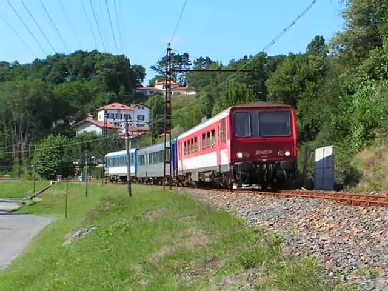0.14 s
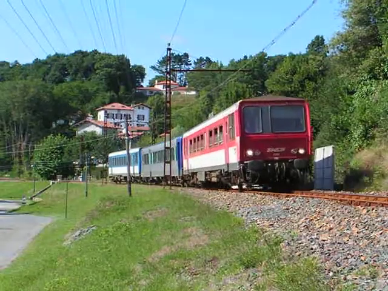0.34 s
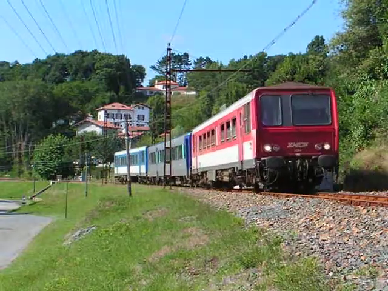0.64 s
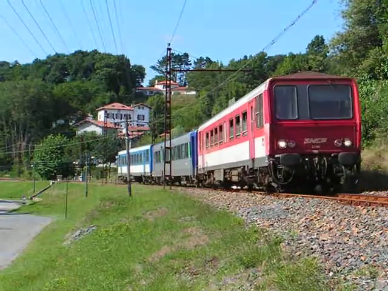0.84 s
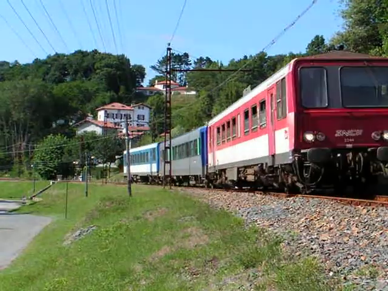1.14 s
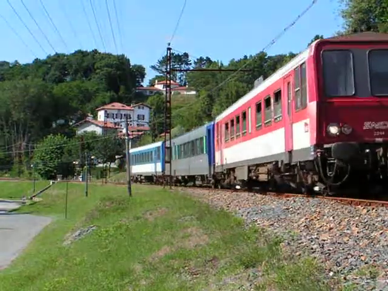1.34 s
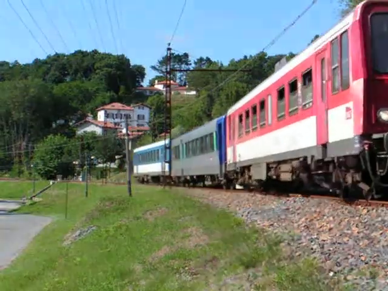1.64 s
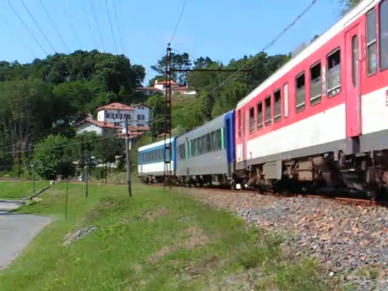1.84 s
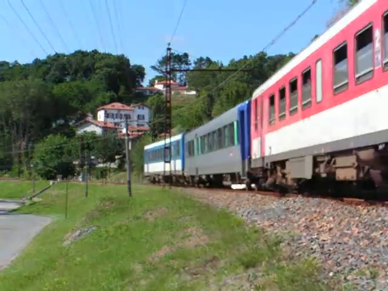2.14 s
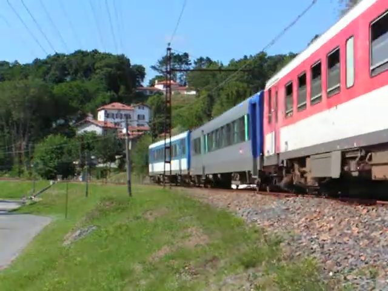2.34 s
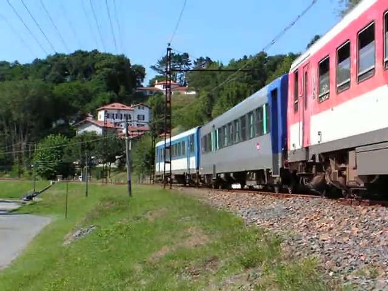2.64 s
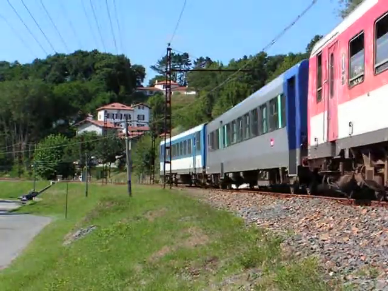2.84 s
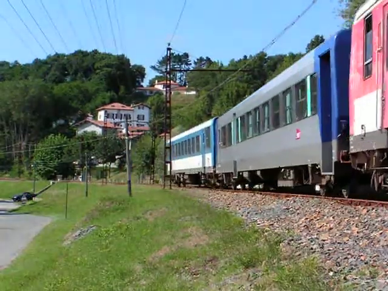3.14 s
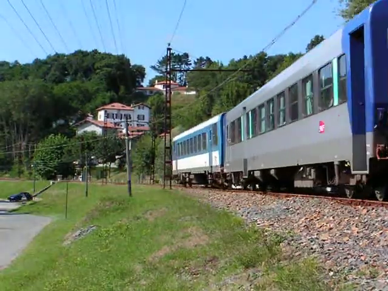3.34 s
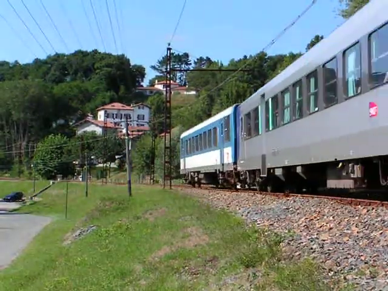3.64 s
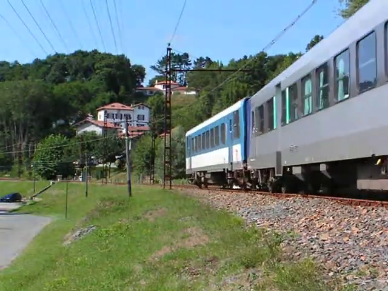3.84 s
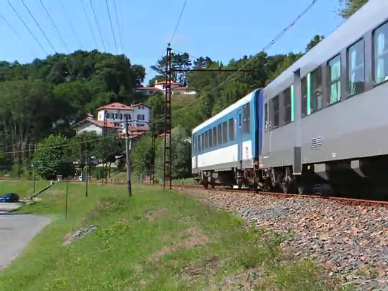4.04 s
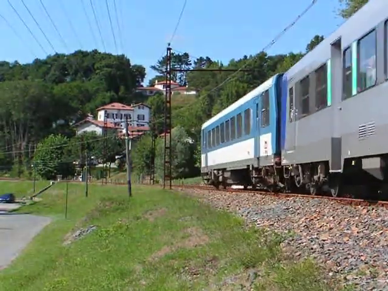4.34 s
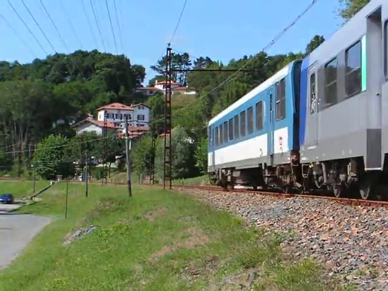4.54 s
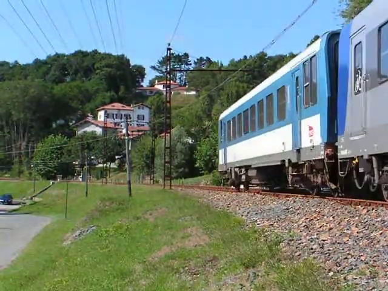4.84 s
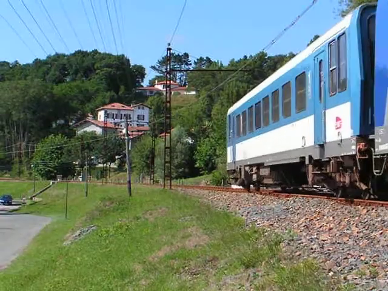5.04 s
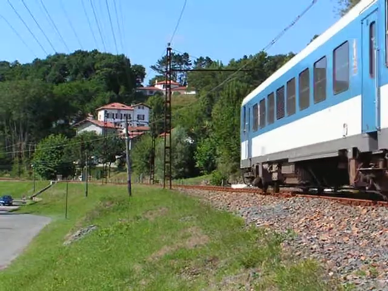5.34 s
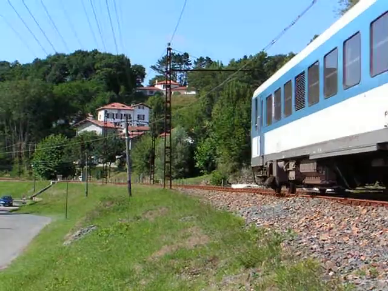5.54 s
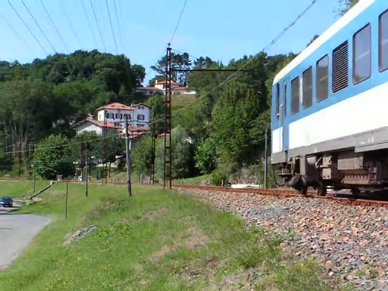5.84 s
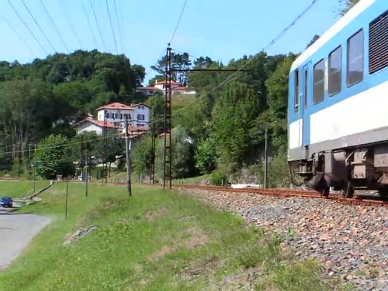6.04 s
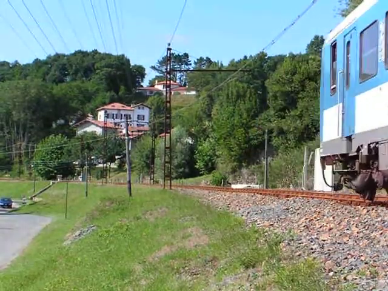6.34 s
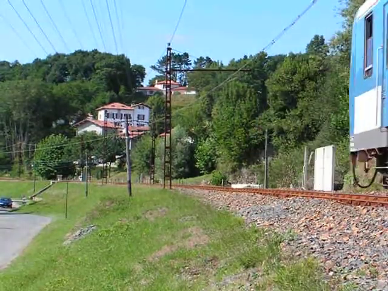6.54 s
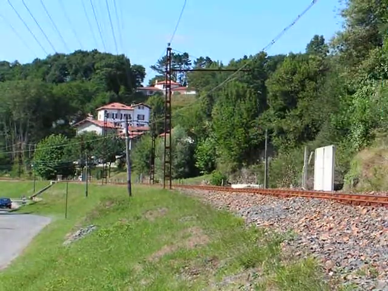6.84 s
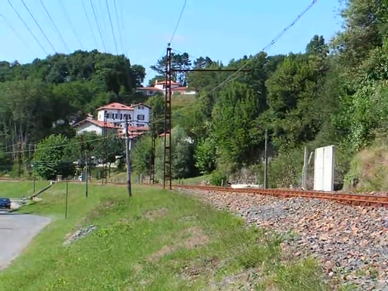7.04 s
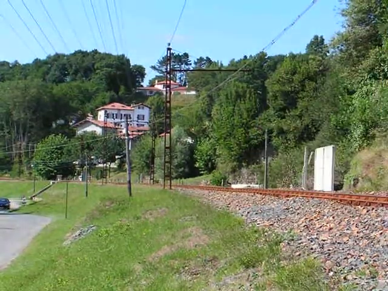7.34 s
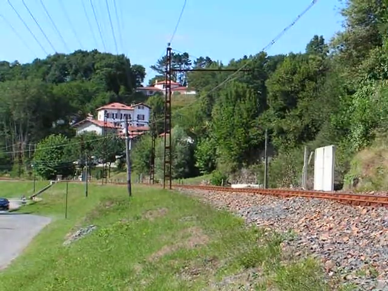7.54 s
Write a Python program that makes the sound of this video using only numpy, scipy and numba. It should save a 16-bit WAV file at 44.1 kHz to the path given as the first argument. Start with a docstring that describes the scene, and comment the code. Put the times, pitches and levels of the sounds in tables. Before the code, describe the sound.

Close trackside train pass: throbbing diesel engine, grinding rails, double clacks over a joint, a mid-train roar, then a loud last bogie.

```python
"""A diesel railcar with coaches passes a few metres from a microphone beside the track.
At first the rails grind and hiss ahead of the train while the engine, made of noisy firing puffs, rumbles by.
Then filtered noise makes sleepers, rails and wheels roar as bogies pass; a middle coach adds a longer roar.
All along, wheels scuff, bang over a rail joint and ring, falling in pitch; the last bogie groans near the end.
The channel is narrow; a blow over the limiter's ceiling ducks everything for a moment."""
import sys
import numpy as np
from scipy import signal
from scipy.fft import rfft, irfft
from scipy.io import wavfile
from scipy.ndimage import uniform_filter1d
from numba import njit

SR = 44100
rng = np.random.default_rng(int(sys.argv[2]) if len(sys.argv) > 2 else 0)


def pcm_store(signal):
    """Save signal as 16-bit PCM."""
    levels = np.round(np.clip(np.atleast_2d(signal), -1, 1) * 32767)
    wavfile.write(sys.argv[1], SR, levels.astype(np.int16).T)


N = 338688

# Leading engine. Each row: time in seconds, exhaust level in dB before surging, under-car boom level in dB.
ENGINE_LEVELS = [(0, -26.5, -33), (.6, -22.5, -40.5), (1.15, -23.5, -31.5), (1.6, -26, -37),
                 (1.88, -23, -26.5), (2.33, -22.5, -30.5), (2.46, -31, -47.5), (2.75, -22.5, -36),
                 (3.35, -33, -45)]
# Exhaust spectrum. Each row: frequency in Hz, gain in dB.
EXHAUST_SPECTRUM = [(21, -53), (35, -20.5), (96, -15), (134, -5), (157, -5.5), (209, -3), (318, -11),
                    (373, -10), (431, -7.5), (476, -7), (645, -18.5), (734, -13.5), (836, -9.5),
                    (980, -32.5), (1100, -18.5), (1430, -38), (2420, -120)]
FIRING_HZ = 45.02  # mean rate
BOOM_HZ, BOOM_WIDTH_HZ = 153, 33

# Rails singing ahead of the train. Each row: time in seconds, grind and hiss levels in dB before trim and flutter.
APPROACH_LEVELS = [(0, -27.5, -23), (.2, -25.5, -20), (.45, -27, -25), (.65, -24, -23), (1.2, -26, -19.5),
                   (1.55, -28.5, -21.5), (1.8, -27.5, -22), (2.25, -28, -24), (2.6, -43, -38)]
# Bogies abreast of the microphone. Each row: time in seconds, then peak levels in dB before trim and
# fluctuation: sleeper rumble, rail roar, rail grind, wheel hiss.
BOGIE_PASSES = [(2.89, -22.5, -24.5, -23, -21), (3.82, -26, -27, -23.5, -28), (4.45, -28, -22, -23, -24),
                (5.62, -26.5, -20.5, -24, -25.5), (6.051, -27, -20, -21.5, -22),
                (7.29, -22, -19.5, -17.5, -22)]
# Long roar of the middle coach. Each row: time in seconds, then rumble, roar, grind and hiss levels in dB
# before trim and fluctuation.
COACH_LEVELS = [(4.6, -31.5, -27, -31, -23.5), (4.87, -25.5, -24.5, -26, -26.5),
                (5.01, -23, -16.5, -18.5, -20), (5.22, -23, -15, -23.5, -25),
                (5.42, -22.5, -21.5, -42, -28), (5.7, -30, -30, -40, -37)]
SPEED_M_S, DISTANCE_M = 11.8, 3.35
# Sleeper rumble spectrum. Each row: frequency in Hz, gain in dB.
SLEEPER_SPECTRUM = [(21, -60), (35, -24), (59, -20.5), (113, -10.5), (168, 0), (271, 3), (348, -4),
                    (420, -4), (550, -26), (920, -120)]
# Centre of the rail's roar. Each row: time in seconds, frequency in Hz.
ROAR_CENTRE = [(2.6, 462), (3.0, 585), (3.8, 605), (4.5, 625), (5.1, 656), (5.6, 597), (6.3, 571),
               (7.1, 510), (7.6, 476)]
# Grinding treads. Each row: frequency in Hz, gain in dB.
GRIND_SPECTRUM = [(750, -15), (930, 0), (1060, -3), (1200, -1), (1430, -2), (1630, 0.5), (1900, 1),
                  (2400, -3)]
# Hissing wheel discs. Each row: frequency in Hz, gain in dB.
HISS_SPECTRUM = [(1600, -19.5), (2050, -3.5), (2400, -1), (2850, 3.5), (3350, 1), (3700, 0), (4300, -7)]

# Short knocks and sharp scuff onsets. Each row: start in seconds, level in dB at the start, pitch in Hz.
KNOCK_EVENTS = [(.116, -11.5, 2970), (1.229, -4.5, 2930), (2.703, -9, 378), (2.745, -10.5, 470),
                (2.770, -11.5, 985), (2.788, -8.5, 1760), (2.815, -5, 2150), (6.995, -8.5, 1250),
                (7.066, -7, 1254)]
# Last bogie's groan. Each row: time in seconds, level in dB.
GROAN_LEVELS = [(6.68, -36), (6.85, -25.5), (7.0, -17.5), (7.15, -17), (7.33, -24), (7.55, -36.5)]
# Its frame resonances. Each row: frequency in Hz, nominal width in Hz before broadening, mean level in dB.
FRAME_MODES = [(108, 51, -5.5), (486, 110, 2.5), (512, 40, 1), (891, 57, 1), (1185, 180, -1.5),
               (1260, 160, -10.5), (1554, 43, 2.5)]

# Flanges brushing the rail. Each row: peak time in seconds, level in dB, treble tilt in dB per octave.
FLANGE_RASPS = [(.875, -13, 0), (1.059, -15, 0), (2.392, -13, 13.5), (2.558, -14, 11), (3.251, -16.5, 0),
                (3.765, -17, -2.5)]
# Steel rubbing on steel. Each row: frequency in Hz, gain in dB before tilt.
SCUFF_SPECTRUM = [(60, -11), (200, -2), (500, 5), (1000, 2.5), (2000, 6), (3300, 9.5), (4200, -4)]
# Scuff before a joint: its peak leads the blow; tilt is in dB per octave.
SCUFF_LEAD_S, SCUFF_RISE_S, SCUFF_FALL_S, SCUFF_TILT_DB = .042, 0.015, 0.028, -0.5
RASP_RISE_S, RASP_FALL_S = 0.033, .027

# Bogies crossing a rail joint. Each row: first axle's time in seconds, first and second scuff levels in dB,
# first and second blow levels in dB, blow tilt in dB per octave, first ring level in dB, its favoured pitch in Hz,
# second ring level in dB, its favoured pitch in Hz, wheel kind (0 railcar, 1 coach).
JOINT_CROSSINGS = [ (1.275, -12, -15.5, 0.5, -2.5, 5.5, -12.5, 3380, -23, 2960, 0),
                   (2.8385, -6, -31, 3.5, 1, 0.5, -15.5, 2610, -13, 3110, 0),
                   (3.973, -14.5, -26.5, -6, -6, .5, -20.5, 2920, -27, 2870, 0),
                   (4.468, -10.5, -13, -4.5, -6.5, 0, -18.5, 2990, -15, 2565, 1),
                   (5.753, -9, -14.5, -3.5, -2.5, 2, -19.5, 2050, -15, 2370, 1),
                   (6.249, -15.5, -31.5, -7.5, -8.5, 2.5, -27, 2820, -29.5, 2600, 0),
                   (7.367, -10, -32, 2.5, 0.5, 1.5, -17.5, 3380, -12.5, 2270, 0)]
AXLE_GAP_S = .1745
# Wheel drop on the rail end. Each row: frequency in Hz, gain in dB before tilt.
BLOW_SPECTRUM = [(50, -32), (150, -9), (300, -2.5), (550, -0.5), (800, -1), (1200, -1), (1600, -2),
                 (2200, -3), (3000, 0), (4200, -9)]
# Railcar wheel modes. Each row: initial pitch in Hz, level in dB, t60 in seconds before rail damping.
RAILCAR_MODES = [(1995, 1, 1.6), (2195, -1, 1.4), (2685, 1, 1.8), (2945, 0, 1.3), (3385, 2, 1.5)]
# Coach wheel modes. Each row: initial pitch in Hz, level in dB, t60 in seconds before rail damping.
COACH_MODES = [(1862, 3, 2.0), (2382, 0, 2.0), (2690, 0, 2.6), (3068, 1, 2.2), (3630, -6, 1.8)]
# Doppler fall of a ring. Columns: railcar, coach [share of initial pitch per second].
DOPPLER_PER_S = (.045, .07)
UNFAVOURED_DB = -10  # limit for a mode far from the favoured pitch

# Narrow channel. Each row: frequency in Hz, gain in dB.
CHANNEL_RESPONSE = [(3400, -2.5), (3800, -9), (4100, -14.5), (4400, -28), (4700, -57.5), (5200, -85.5)]
LIMIT_AT, CLIP_AT = 0.66, .72  # amplitudes
TOP_HZ = 15850


def undb(db):
    """Decibels to gain."""
    return 10 ** (np.asarray(db) / 20)


def unit(x):
    """Scale to rms 1."""
    return x / np.sqrt(np.mean(x ** 2))


def curve(table, axis=1, fade_db_per_s=0):
    """One column joined by straight lines in time; a level may fade away beyond both ends."""
    rows, t = np.array(table), np.arange(N) / SR
    outside_s = abs(t - np.clip(t, rows[0, 0], rows[-1, 0]))
    return np.interp(t, rows[:, 0], rows[:, axis]) - fade_db_per_s * outside_s


def swell(table, axis=1):
    """Gain following a level curve and dying away outside it."""
    return undb(curve(table, axis=axis, fade_db_per_s=80))


def colour(x, spectrum, tilt_db_per_octave=0):
    """Filter by (Hz, dB) points, tilted about 2 kHz and falling away beyond both ends."""
    hz, db = np.transpose(spectrum)
    octave = np.log2(np.maximum(np.fft.rfftfreq(len(x), 1 / SR), 1))
    inside = np.clip(octave, np.log2(hz[0]), np.log2(hz[-1]))
    gain_db = np.interp(octave, np.log2(hz), db)
    gain_db += tilt_db_per_octave * (inside - 11)  # 2 ** 11 Hz
    gain_db -= 24 * abs(octave - inside)
    return irfft(rfft(x) * undb(gain_db), len(x))


def walk(rate_hz, size=N):
    """Random levels, each held 1 / rate_hz then smoothed into slopes; rms 1."""
    hold = max(int(SR / rate_hz), 1)
    steps = np.repeat(rng.standard_normal(size // hold + 1), hold)
    return unit(uniform_filter1d(steps, hold)[:size])


def gritty(grit_db):
    """Dense tiny impacts of rough steel: noise of uneven size."""
    return rng.standard_normal(N) * undb(grit_db * walk(500))


def add(out, start_s, x):
    """Mix x in from a given time, cropping both ends."""
    i = int(start_s * SR)
    x, i = x[max(-i, 0):], max(i, 0)
    out[i:i + len(x)] += x[:max(N - i, 0)]


@njit
def resonance(x, centre_hz, width_hz):
    """State-variable band-pass with a moving centre."""
    y, band, low = np.empty(len(x)), 0., 0.
    for i in range(len(x)):
        g, damping = np.tan(np.pi * centre_hz[i] / SR), width_hz / centre_hz[i]
        v = (band + g * (x[i] - low)) / (1 + g * (g + damping))
        band, low, y[i] = 2 * v - band, low + 2 * g * v, damping * v
    return y


def resonance_pair(x, centre_hz, width_hz):
    """Two equal resonances in series, for steeper skirts."""
    return resonance(resonance(x, centre_hz, width_hz), centre_hz, width_hz)


def passing(axis):
    """Gain of a rolling noise: sideways radiation makes bogies swell and fade quickly; the coach adds power."""
    t, power = np.arange(N) / SR, swell(COACH_LEVELS, axis=axis) ** 2
    for bogie in BOGIE_PASSES:
        along_m = SPEED_M_S * (t - bogie[0])
        gain = undb(bogie[axis]) / (1 + (along_m / DISTANCE_M) ** 2)
        power = power + gain ** 2
    return np.sqrt(power)


def engine(pulse_db=-6, surge_db=1.0):
    """Uneven firings release puffs of gas that boom under the car body; the car then moves out of earshot."""
    phase = np.cumsum(FIRING_HZ * (1 + .03 * walk(30))) / SR % 1
    stroke = np.exp(-phase / 0.5)
    gas = (stroke + 2.0) * rng.standard_normal(N)
    pulses = undb(pulse_db) * unit(np.diff(stroke, prepend=1)) * walk(60)
    exhaust = unit(colour(gas + pulses, EXHAUST_SPECTRUM))
    boom = unit(resonance(exhaust, np.full(N, float(BOOM_HZ)), float(BOOM_WIDTH_HZ)))
    exhaust_gain = swell(ENGINE_LEVELS, axis=1) * undb(surge_db * walk(12))
    return exhaust * exhaust_gain + boom * swell(ENGINE_LEVELS, axis=2)


def track(rumble_trim_db=0.84, roar_trim_db=0.7):
    """Bogies shake the sleepers and drive the rail's broad bending resonance."""
    judder = walk(24)
    rumble = unit(colour(gritty(grit_db=1.0), SLEEPER_SPECTRUM)) * passing(axis=1)
    roar = unit(resonance_pair(gritty(grit_db=1.0), curve(ROAR_CENTRE), 520.)) * passing(axis=2)
    return rumble * undb(rumble_trim_db + 0.92 * judder) + roar * undb(roar_trim_db + 1.2 * judder)


def rolling(grind_trim_db=0.07, hiss_trim_db=0.87):
    """Rough treads grind on the rail and hiss in the wheel discs, fluttering together; rails carry it ahead."""
    flutter = walk(28)
    grind_gain = np.hypot(passing(axis=3), swell(APPROACH_LEVELS, axis=1))
    grind = unit(colour(gritty(grit_db=1.5), GRIND_SPECTRUM)) * grind_gain
    hiss_gain = np.hypot(passing(axis=4), swell(APPROACH_LEVELS, axis=2))
    hiss = unit(colour(gritty(grit_db=1.0), HISS_SPECTRUM)) * hiss_gain
    return grind * undb(grind_trim_db + 0.72 * flutter) + hiss * undb(hiss_trim_db + 1.2 * flutter)


def knocks(width_share=.75, t60_s=.09):
    """Short knocks and sharp scuffs: noise through a broad resonance, decaying fast."""
    out, t = np.zeros(N), np.arange(SR // 4) / SR
    for start_s, db, hz in KNOCK_EVENTS:
        noise = rng.standard_normal(len(t))
        body = unit(resonance_pair(noise, np.full(len(t), float(hz)), float(width_share * hz)))
        add(out, start_s, body * undb(db - 60 * t / t60_s))
    return out


def groan():
    """The last bogie's flanges rub in the curve and shake its frame in lumpy bursts."""
    rub = gritty(grit_db=1.5) * undb(1.1 * walk(35))
    frame = 0
    for hz, width_hz, db in FRAME_MODES:
        mode = resonance_pair(rub, np.full(N, float(hz)), 1.5 * width_hz)
        frame = frame + mode * undb(db + 1.6 * walk(16))
    return unit(frame) * swell(GROAN_LEVELS)


def rasp(rise_s, fall_s, tilt_db_per_octave):
    """Steel rubs on steel, swelling and dying; the peak lies in the middle of half a second."""
    t = np.arange(SR // 2) / SR - 1 / 4
    rub = unit(colour(rng.standard_normal(len(t)), SCUFF_SPECTRUM, tilt_db_per_octave))
    return rub * np.exp(-abs(t) / np.where(t < 0, rise_s, fall_s))


def scuffs():
    """Each wheel rasps over the worn rail before a joint; now and then a flange brushes the rail."""
    out = np.zeros(N)
    for axle_s, first_db, second_db, *_ in JOINT_CROSSINGS:
        for at_s, db in (axle_s, first_db), (axle_s + AXLE_GAP_S, second_db):
            x = undb(db) * rasp(SCUFF_RISE_S, SCUFF_FALL_S, SCUFF_TILT_DB)
            add(out, at_s - SCUFF_LEAD_S - len(x) / SR / 2, x)
    for peak_s, db, tilt in FLANGE_RASPS:
        x = undb(db) * rasp(RASP_RISE_S, RASP_FALL_S, tilt)
        add(out, peak_s - len(x) / SR / 2, x)
    return out


def wheel_ring(modes, favoured_hz, doppler_per_s, waver=0.003, flutter_db=3.5, damping_db_per_s=14):
    """Struck wheel modes ring, damped by the rail; they flutter as the wheel turns and sink as it goes by."""
    t = np.arange(2 * SR) / SR
    ring = 0
    for hz, db, t60_s in modes:
        # the spot where the tread is struck decides which mode speaks most
        strike_db = UNFAVOURED_DB * (1 - np.exp(-((hz - favoured_hz) / 260) ** 2))
        pitch_hz = hz * (1 - doppler_per_s * t + waver * walk(40, size=len(t)))
        turns = np.cumsum(pitch_hz) / SR + rng.random()
        decay_db = (60 / t60_s + damping_db_per_s) * t
        level_db = db + strike_db + flutter_db * walk(30, size=len(t)) - decay_db
        ring = ring + undb(level_db) * np.sin(2 * np.pi * turns)
    return ring * np.minimum(t / 0.0048, 1)


def blow(tilt_db_per_octave, chatter_s=0.012, blow_t60_s=0.11, tail_db=-12, tail_t60_s=0.52):
    """The wheel drops on the rail end and chatters briefly; the bogie rattles."""
    t = np.arange(SR // 2) / SR
    chatter, tail = rng.standard_normal((2, len(t)))
    # the load builds up over the first milliseconds
    rise_db = -3 * np.exp(-t / .003)
    chatter_db = rise_db - 60 * np.maximum(t - chatter_s, 0) / blow_t60_s
    chatter = unit(colour(chatter, BLOW_SPECTRUM, tilt_db_per_octave)) * undb(chatter_db)
    # the wheel disc takes a moment to pick up the blow
    pickup = np.minimum(t / 0.005, 1)
    tail = unit(colour(tail, HISS_SPECTRUM)) * undb(tail_db - 60 * t / tail_t60_s) * pickup
    return chatter + tail


def joints():
    """The two axles of a bogie hit the joint one after the other, and each wheel rings on."""
    out = np.zeros(N)
    for row in JOINT_CROSSINGS:
        axle_s, _, _, first_db, second_db, tilt, ring1_db, ring1_hz, ring2_db, ring2_hz, wheel = row
        kind = int(wheel > .5)
        modes = (RAILCAR_MODES, COACH_MODES)[kind]
        first = axle_s, first_db, ring1_db, ring1_hz
        second = axle_s + AXLE_GAP_S, second_db, ring2_db, ring2_hz
        for at_s, db, ring_db, favoured_hz in (first, second):
            add(out, at_s, undb(db) * blow(tilt))
            add(out, at_s, undb(ring_db) * wheel_ring(modes, favoured_hz, DOPPLER_PER_S[kind]))
    return out


def scene():
    """The whole train at one microphone."""
    return (engine() + track() + rolling() + knocks() + groan() + scuffs() + joints())[None]


@njit
def limiter(x, ceiling, attack_s, release_s):
    """Turn the gain down quickly while the tracked peak is over the ceiling; let it back slowly."""
    y, peak = np.empty(len(x)), 0.
    for i in range(len(x)):
        peak += (abs(x[i]) - peak) / (SR * (attack_s if abs(x[i]) > peak else release_s))
        y[i] = x[i] * ceiling / max(peak, ceiling)
    return y


def record(dry, attack_s=0.00038, release_s=0.27):
    """Limit, narrow and clip: fast peaks can slip past the limiter and clip; then low-pass."""
    held = limiter(dry[0], float(LIMIT_AT), float(max(attack_s, 1 / SR)), float(release_s))
    narrow = colour(held, [(15, 0.016)] + list(CHANNEL_RESPONSE))
    clipped = np.clip(narrow, -CLIP_AT, CLIP_AT)
    lowpass = signal.ellip(8, .2, 70, TOP_HZ, fs=SR, output="sos")
    return signal.sosfilt(lowpass, clipped)[None]


dry = scene()
out = record(dry)
pcm_store(out)
```